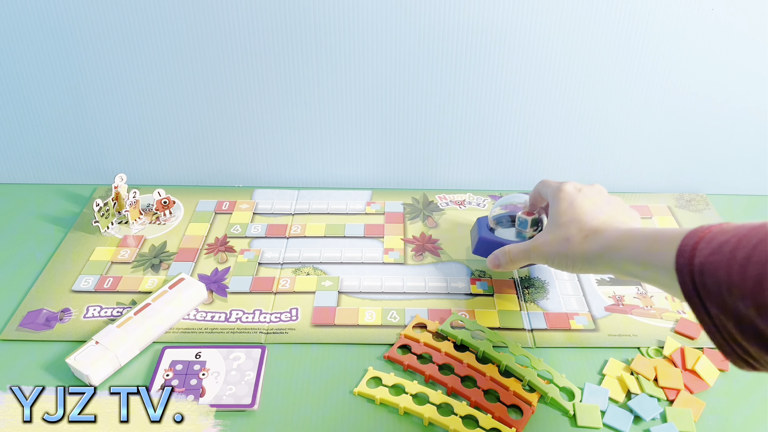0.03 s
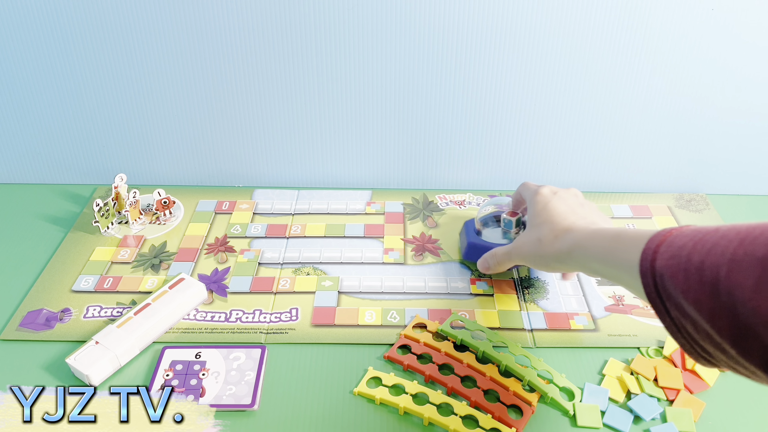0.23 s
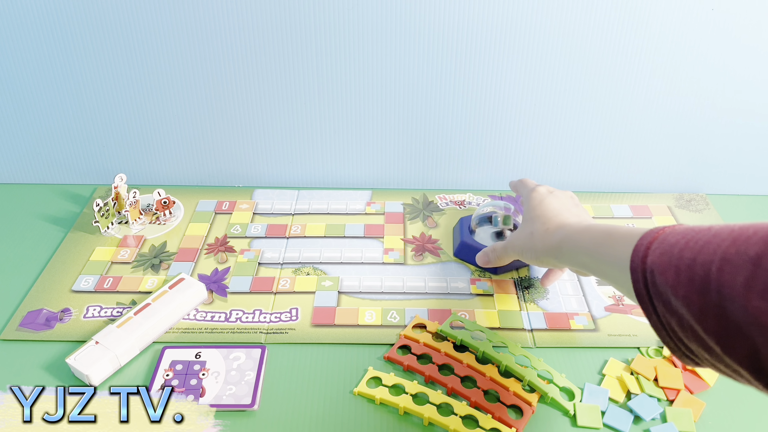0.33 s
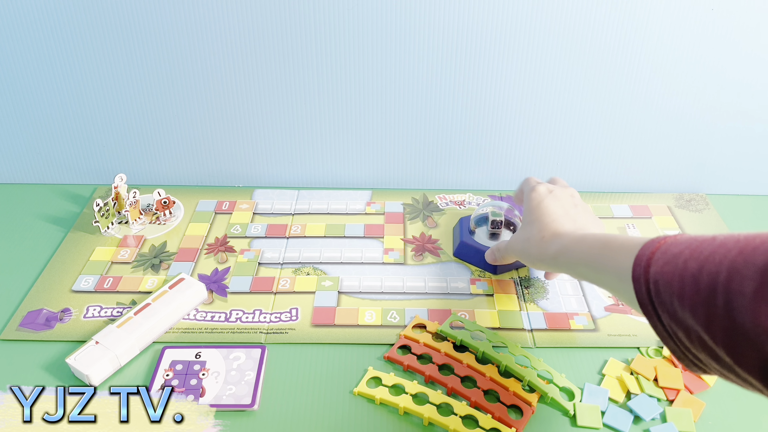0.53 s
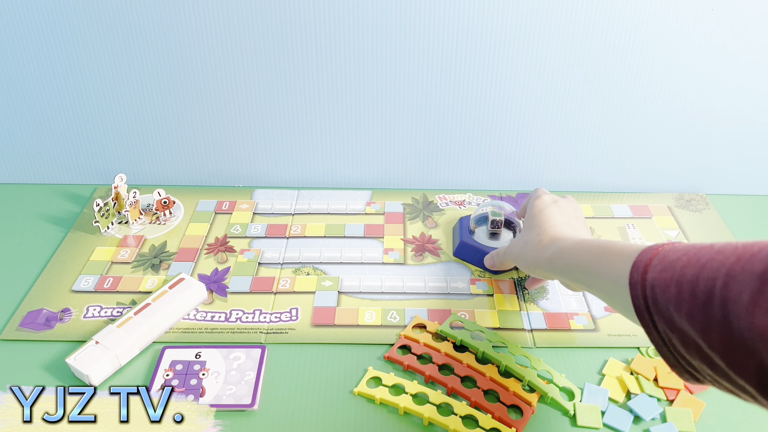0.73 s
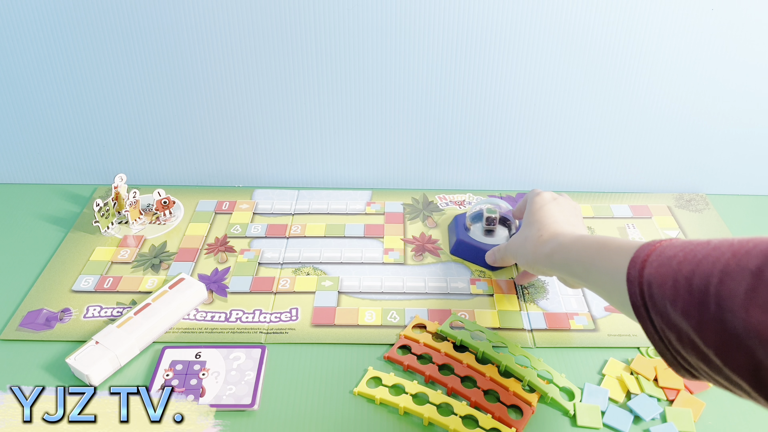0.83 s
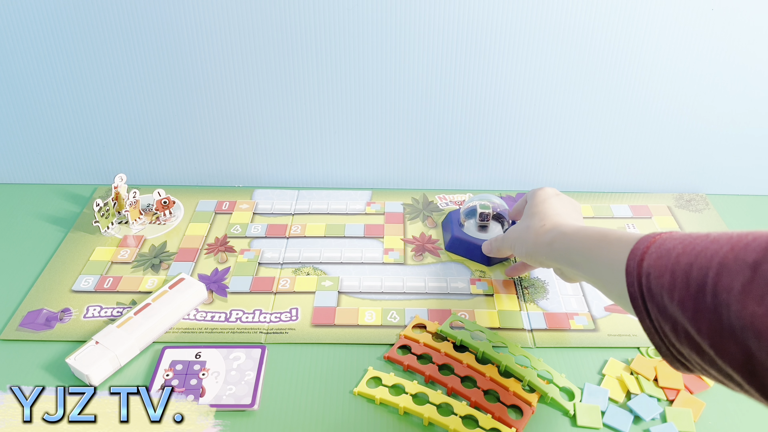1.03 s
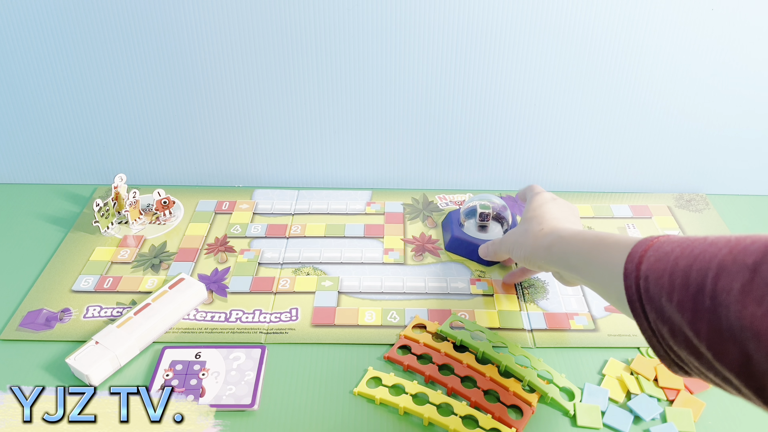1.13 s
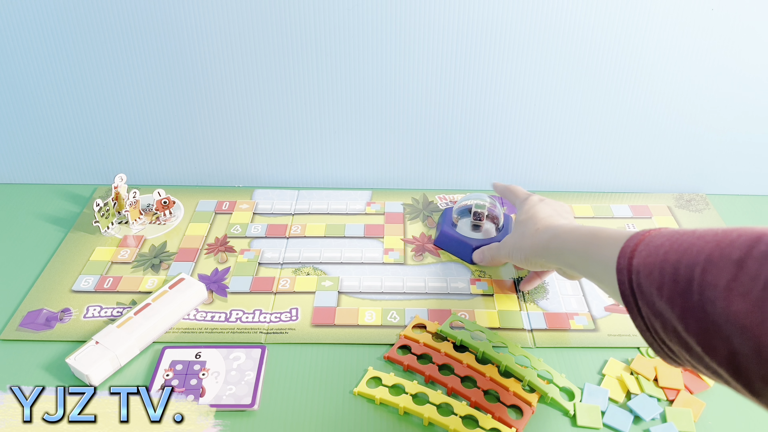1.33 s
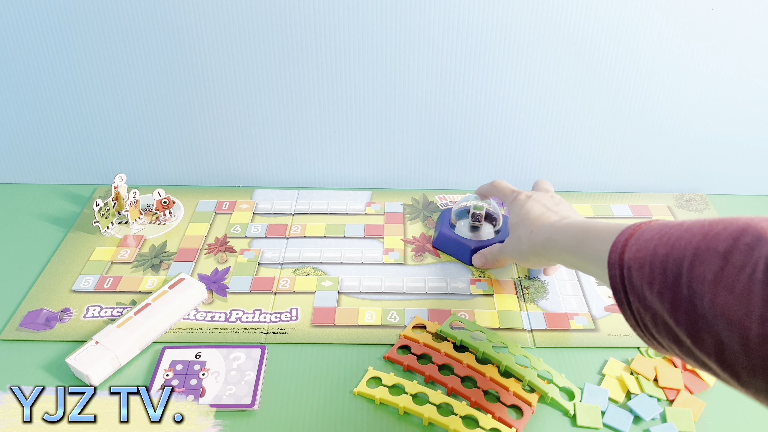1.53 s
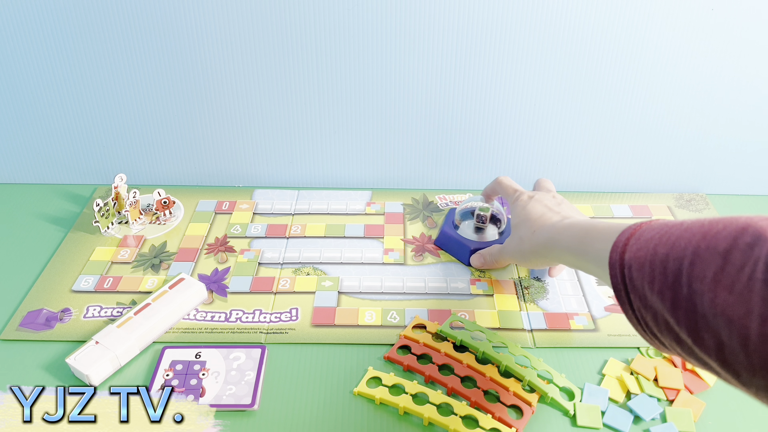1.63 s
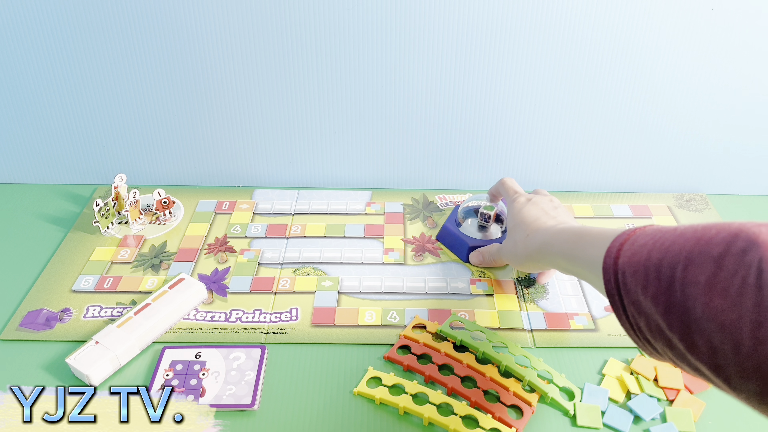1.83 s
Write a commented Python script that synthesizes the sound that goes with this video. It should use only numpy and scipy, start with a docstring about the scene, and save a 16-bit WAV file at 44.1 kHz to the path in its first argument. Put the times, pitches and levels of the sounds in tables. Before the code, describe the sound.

A plastic dice dome pops once at about 0.22 seconds: a tight burst of hard cracks with a low thump, then the die rattles densely until about 0.4, with a short plastic ring and small-room reflections. Quiet double clicks come near 0.77 and 1.25, soft board knocks at 1.37 and 1.53. Faint grainy hand rubbing and an uneven low rumble run throughout; a very faint tone fades at the start.

```python
"""Dice popper on a game board

A spring plate snaps with sharp plastic cracks and a low thump, and a die rattles around the dome.
Noise bands decaying from each contact make the dense clatter; wavering sines make the dome's ring.
Hand and sleeve rub softly throughout as grainy coloured noise. A faint wavering tone dies away at
the start; a few light clicks, knocks and short scuffs follow the rattle. Reflections give the small
room around the clatter, over a low rumble of noise whose bass swells and sinks."""
import sys
import numpy as np
from scipy import signal
from scipy.io import wavfile
from scipy.ndimage import uniform_filter1d

SR = 44100
rng = np.random.default_rng(int(sys.argv[2]) if len(sys.argv) > 2 else 0)


def digitize_waveform(pressure):
    """Quantize a signal to 16-bit integers and store it at the path in sys.argv[1].

    Rows of a 2-D input are taken as channels; values are limited to [-1, 1].
    """
    field = np.atleast_2d(pressure).T
    bounded = np.clip(field, -1, 1)
    quanta = np.round(bounded * 32767).astype(np.int16)
    wavfile.write(sys.argv[1], SR, quanta)


N = 83790
TIME = np.arange(N) / SR
EDGES = 25 * 2 ** (np.arange(29) / 3)   # third-octave band edges [Hz]


def from_db(db):
    """Decibels to an amplitude factor."""
    return 10 ** (np.asarray(db) / 20)


def rms_one(x):
    """Scales a signal to an rms of 1."""
    return x / np.sqrt(np.mean(x ** 2) + 1e-20)


def at_hz(points, hz):
    """Reads a curve at a frequency, interpolating along log frequency."""
    curve_hz, values = np.array(points).T
    return np.interp(np.log(hz), np.log(curve_hz), values)


def dying(t, t60):
    """Falls by 60 dB in t60 seconds."""
    return np.exp(-np.log(1000) * t / t60)


def flutter(size):
    """Random wavering, smoothed twice over size samples; rms 1."""
    smoothed = uniform_filter1d(rng.standard_normal(N), size=size)
    return rms_one(uniform_filter1d(smoothed, size=size))


def bands():
    """Yields each third-octave band as (centre Hz, filter, stereo noise of that band's width)."""
    # side against middle: (frequency [Hz], level [dB])
    side_width = [(60, -15.5), (200, -11.5), (380, -7), (700, 0.5), (1290, 3.5), (2200, -7), (4400, -1),
                  (9000, -5), (15000, 6)]
    white = rng.standard_normal((2, 2, N))
    for k, edges in enumerate(zip(EDGES, EDGES[1:])):
        sos = signal.butter(2, edges, "band", fs=SR, output="sos")
        hz = np.sqrt(np.prod(edges))
        mid, side = white[k % 2]   # neighbouring bands get different noise
        width = from_db(at_hz(side_width, hz))
        stereo = np.array([mid + width * side, mid - width * side])
        yield hz, sos, stereo / np.hypot(1, width)


def coloured_noise(spectrum):
    """Steady stereo noise shaped band by band; rms 1."""
    out = 0
    for hz, sos, noise in bands():
        out = out + from_db(at_hz(spectrum, hz)) * signal.sosfilt(sos, noise)
    return rms_one(out)


def rumble():
    """Steady room noise whose bass swells and sinks."""
    # noise colour before levelling: (frequency [Hz], density [dB per Hz])
    colour = [(25, -28), (42, -8), (70, 2), (100, -4.5), (160, -7), (280, -13), (430, -5.5), (600, -17),
              (1000, -15.5), (2000, -32), (4000, -41.5), (8000, -45.5), (15000, -50)]
    # gain of the bass: (time [s], level [dB])
    bass_swell = [(0, 5), (.2, -2), (.47, -10), (.61, 7.5), (.76, 0.5), (.86, -2), (1.03, 4.5),
                  (1.25, -2.5), (1.65, 0), (1.9, -2)]
    level_db, swell_below_hz = -55.5, 160   # level before the swell
    noise = from_db(level_db) * coloured_noise(colour)
    low_pass = signal.butter(2, swell_below_hz, fs=SR, output="sos")
    bass = signal.sosfiltfilt(low_pass, noise)
    bass_gain = from_db(np.interp(TIME, *np.transpose(bass_swell)))
    return noise + bass * (bass_gain - 1)


def rubbing(grain_db=1.5):
    """Skin and cloth slide over plastic: a faint, grainy hiss."""
    # strokes before the grain: (time [s], level [dB])
    strokes = [(0, -53), (.09, -70.5), (.17, -64), (.55, -59.5), (.62, -70), (.665, -58), (.70, -62.5),
               (.755, -55.5), (.83, -64.5), (.97, -73), (1.06, -65), (1.21, -55.5), (1.35, -65),
               (1.41, -60.5), (1.56, -64.5), (1.69, -74.5), (1.745, -60.5), (1.84, -83.5), (1.9, -61.5)]
    # hiss colour before levelling: (frequency [Hz], density [dB per Hz])
    colour = [(300, -6), (900, 8.5), (2000, 1.5), (2700, -8), (4200, -5), (6500, -13), (9500, -7),
              (12300, -22), (14500, -11)]
    level_db = np.interp(TIME, *np.transpose(strokes)) + grain_db * flutter(size=120)
    return from_db(level_db) * coloured_noise(colour)


def room(x):
    """Dense reflections build up quickly and die away, sooner in the treble."""
    # reverberation time: (frequency [Hz], t60 [s])
    room_t60 = [(120, 0.49), (500, 0.49), (1500, 0.49), (5000, 0.41), (12000, 0.22)]
    room_db, build_s = -9.5, 0.0059
    response = 0
    for hz, sos, noise in bands():
        envelope = dying(TIME, at_hz(room_t60, hz)) * (1 - np.exp(-TIME / build_s))
        response = response + signal.sosfilt(sos, noise * envelope)
    response = rms_one(response) / np.sqrt(N)   # mean energy of 1 per channel
    # the left channel alone feeds the stereo room
    return from_db(room_db) * signal.fftconvolve(x[:1], response, axes=1)[:, :N]


def tabletop(x):
    """Close reflections off board and table join the direct sound and comb the spectrum."""
    # reflections: (left delay [ms], right delay [ms], level against the direct sound [dB])
    echoes = [(.93, 1.3, -17.5), (2.15, 2.2, -14.5), (3.6, 3.1, -9), (6.1, 5.9, -12)]
    out = x
    for left_ms, right_ms, db in echoes:
        left = np.interp(TIME - left_ms / 1000, TIME, x[0], left=0)
        right = np.interp(TIME - right_ms / 1000, TIME, x[1], left=0)
        out = out + from_db(db) * np.array([left, right])
    return from_db(-2) * out   # direct sound and reflections together


def hollow(x):
    """The housing radiates poorly between its resonances, so notches cut the spectrum there."""
    # notches: (frequency [Hz], width [Hz])
    hollows = [(305, 26), (585, 80), (895, 28), (1470, 120), (2360, 200), (3660, 170)]
    for hz, width_hz in hollows:
        x = signal.lfilter(*signal.iirnotch(hz, hz / width_hz, fs=SR), x)
    return x


def blows(hits, hz):
    """One impulse per contact, as strong as the contact is at this frequency."""
    s, db, tilt = np.transpose(hits)
    out = np.zeros(N)
    strength = from_db(db + tilt * np.log2(hz / 2500))   # brightness tilts about 2.5 kHz
    np.add.at(out, (s * SR).astype(int), strength)
    return out + 1e-18   # keeps later divisions safe


def housing(hits, colour, t60_s, crack_db):
    """Each contact cracks and sets the many damped modes of the plastic ringing, the high ones briefly."""
    crack_s, ring_shortens = 0.00043, 0.32   # amplitude time constant; power of frequency
    out = 0
    for hz, sos, noise in bands():
        force = blows(hits, hz)
        t60 = t60_s * (1000 / max(hz, 400)) ** ring_shortens   # t60_s holds at 1 kHz
        # energy decays twice as fast as amplitude
        ring = signal.lfilter([1], [1, -dying(2 / SR, t60)], force ** 2)
        crack_force = from_db(crack_db) * force
        crack = signal.lfilter([1], [1, -np.exp(-2 / (crack_s * SR))], crack_force ** 2)
        burst = signal.sosfilt(sos, noise * np.sqrt(ring + crack))
        out = out + from_db(at_hz(colour, hz)) * burst
    return out * from_db(-5)   # level of the whole housing


def ringing(hits, modes, slip=0.55, wander=.014):
    """Every contact adds energy to each mode and knocks its phase; the ring wavers as it dies."""
    waver_db = 4.5
    out = 0
    for hz, db, t60, phase in modes:
        fed = blows(hits, hz) ** 2
        energy = signal.lfilter([1], [1, -dying(2 / SR, t60)], fed)
        # phase jumps with each fresh share of energy and drifts in between
        kicks = (slip * np.sqrt(fed / energy) + wander) * rng.standard_normal(N)
        angle = 2 * np.pi * hz * TIME + np.cumsum(kicks)
        level = from_db(db + waver_db * flutter(size=700))
        out = out + level * np.sqrt(energy) * np.sin([angle, angle + phase])
    return out


def faint_tone_and_scuffs():
    """A faint wavering tone dying away at the start, then short scuffs: noise through one resonance each."""
    # the tone, then the scuffs: (time of peak [s], length [s], level [dB], resonance [Hz], width [Hz])
    sounds = [(0.004, 0.049, -53, 1278, 12), (1.086, 0.046, -58.5, 975, 220),
              (1.753, 0.057, -70.5, 2060, 850)]
    out = 0
    for s, length_s, db, hz, width_hz in sounds:
        resonance = signal.iirpeak(hz, hz / width_hz, fs=SR)
        tone = signal.lfilter(*resonance, rng.standard_normal(N))
        swell = np.exp(-(2 * (TIME - s) / length_s) ** 2)
        out = out + from_db(db) * swell * rms_one(tone)
    return out


def handling():
    """Clicks ring the popper in the hand; knocks ring the board as well."""
    # light clicks: (time [s], level at 2.5 kHz [dB], brightness [dB per octave])
    clicks = [(.7715, -42.5, -5.5), (.778, -42.5, -4), (0.791, -57.5, -3), (1.2462, -42, -2.5),
              (1.2495, -39.5, -1), (1.256, -42.5, -4)]
    # soft knocks against the board: (time [s], level at 2.5 kHz [dB], brightness [dB per octave])
    knocks = [(1.3665, -50.5, -3.5), (1.3689, -42.5, -1.5), (1.5264, -49.5, -2.5)]
    # colour of clicks and knocks: (frequency [Hz], density [dB per Hz])
    colour = [(150, -18.5), (430, 5), (560, -6.5), (780, 10), (1200, -14), (1750, 8), (2400, -24),
              (3200, 4), (6500, -6), (9500, 4.5), (15000, -19)]
    # modes of the popper: (frequency [Hz], level [dB], t60 [s], left-right phase [rad])
    popper_modes = [(1684, -6.5, 0.0358, .3), (2123, -11.5, 0.05, 0.89), (2800, -14, 0.036, 0.98),
                    (3190, -16, 0.052, 0.82), (3460, -22, 0.051, 1), (4400, -21, 0.038, .5),
                    (4810, -16, 0.052, 0.65), (5900, -19, 0.028, 0.93), (7500, -14.5, 0.041, 0.47)]
    # modes of the board: (frequency [Hz], level [dB], t60 [s], left-right phase [rad])
    board_modes = [(460, -6.5, 0.064, .3), (733, -7.5, 0.05, 0.85), (935, -14, .035, 0.75)]
    ticks = housing(np.vstack([clicks, knocks]), colour, t60_s=0.059, crack_db=0)
    clicked_popper = ringing(clicks, popper_modes, slip=0.366)
    knocked_popper = from_db(-6) * ringing(knocks, popper_modes, slip=0.412)
    board = ringing(knocks, board_modes, slip=0.22, wander=0.0026)
    return ticks + clicked_popper + knocked_popper + board


def thump():
    """The flipping plate pushes the air in the dome: low, quickly damped swings."""
    # swings: (time [s], level [dB], frequency [Hz], t60 [s])
    swings = [(0.2244, -42, 222, 0.1), (0.229, -28.5, 432, 0.045)]
    out = 0
    for s, db, hz, t60 in swings:
        t = np.maximum(TIME - s, 0)
        out = out + from_db(db) * dying(t, t60) * np.sin(2 * np.pi * hz * t)
    return out


def dome_ring(snaps, rattle):
    """Plate and die feed the modes of dome and plate; the light die stirs the low ones less."""
    # modes: (frequency [Hz], level [dB], t60 [s], left-right phase [rad])
    modes = [(228, -33, 0.096, 0.3), (390.4, -35, 0.07, 0.64), (466.4, -34.5, 0.13, 1.8),
             (699, -22, 0.1, 1.28), (812, -32.5, .1, 1.5), (991, -31, .11, 3.5), (1066, -30.5, 0.11, -0.5),
             (1150.3, -29, 0.35, 4.5), (1210, -31.5, 0.5, 1.5), (1286, -38.5, 0.18, 3),
             (1630, -33.5, 0.19, 1.3), (1858, -30.5, 0.18, 0.4), (1920, -32, 0.12, -0.1),
             (1980, -34, 0.16, -2), (2103, -35, 0.18, -1), (2462, -34.5, 0.14, 1.45),
             (2660, -35, 0.29, -2.9), (2847, -36, 0.28, 1.9), (3120, -37, 0.09, -1.1),
             (3253, -38.5, 0.35, -0.8), (3890, -39.5, 0.16, -0.6), (4400, -39.5, .3, -0.5),
             (4990, -38, 0.2, -2), (6040, -38, 0.28, 2)]
    brighter_die = rattle + [0, 0, 2]   # extra brightness [dB per octave]
    return ringing(np.vstack([snaps, brighter_die]), modes)


def tumbling(count=4):
    """After each bounce the tumbling die's corners touch again, lightly and at uneven intervals."""
    # bounces on dome and plate: (time [s], level at 2.5 kHz [dB], brightness [dB per octave])
    bounces = np.array([(0.2658, -28.5, 7), (.274, -33, 8), (0.283, -19.5, -0.5), (.288, -17, -3.5),
                        (0.2923, -15, 1), (0.296, -21.5, 0.5), (0.3082, -19.5, 3.5), (.316, -26.5, 4.5),
                        (.322, -24, 0.5), (.328, -20, -0.5), (0.331, -26, 5), (.341, -22, -1),
                        (0.347, -35, 9), (0.351, -21, 1.5), (.357, -18.5, 3.5), (0.3603, -18, 0),
                        (0.364, -26.5, -4.5), (0.371, -39.5, 10), (0.376, -31, -1.5), (0.381, -40, 10.5)])
    chatter_s, chatter_db = 0.01, -8.5   # touches fall within this time, at least this much softer
    delay, softness = rng.random((len(bounces), count, 2)).transpose(2, 0, 1)
    touches = np.repeat(bounces, count, axis=0)
    touches[:, 0] += chatter_s * delay.ravel()
    touches[:, 1] += chatter_db - 4 * softness.ravel()
    return np.vstack([bounces, touches])


def rattling_die(rattle):
    """The die's lighter contacts crack and ring the plastic."""
    # colour of the contacts' noise: (frequency [Hz], density [dB per Hz])
    colour = [(100, -39.5), (220, -14.5), (400, -0.5), (720, 3.5), (950, -6.5), (1150, 6), (1450, 5),
              (2080, 5), (2500, -9.5), (3200, -1.5), (3700, -3.5), (5200, 0), (7000, -6.5), (9000, -0.5),
              (12500, -12.5), (15000, -4)]
    return housing(rattle, colour, t60_s=0.05, crack_db=0.5)


def snapping_plate(snaps):
    """The spring plate buckles and snaps: hard cracks and a dense short ring of the housing."""
    # colour of the snaps' noise: (frequency [Hz], density [dB per Hz])
    colour = [(30, -53), (60, -36), (130, -19), (210, -13.5), (310, -10.5), (450, -5), (720, -3), (950, -5),
              (1150, -1.5), (1450, -2), (1950, 3), (2400, -0.5), (3100, 6.5), (3700, 0.5), (5000, 2),
              (7000, -3), (10000, 4), (12500, -25.5), (15000, 1)]
    return housing(snaps, colour, t60_s=0.063, crack_db=8.5)


def scene():
    """The popper and its reflections, the rubbing hand and the room's rumble."""
    # snaps of the plate: (time [s], level at 2.5 kHz [dB], brightness [dB per octave])
    snaps = [(.2232, -14.5, -4), (.2276, -11, -0.5), (.2294, -9, 1), (.2335, -18, -0.3),
             (.2388, -12.5, -2.5), (.2406, -5.5, -3.5), (.2425, -7.5, -3.8), (.2475, -13.5, -1),
             (.2510, -11.5, 0.5), (.2575, -19.5, -2.5)]
    background = rumble() + rubbing()
    rattle = tumbling()
    pop = snapping_plate(snaps) + rattling_die(rattle)
    clatter = hollow(tabletop(pop)) + handling() + faint_tone_and_scuffs()
    dome = dome_ring(snaps, rattle) + thump()   # stays out of the room reflections
    return background + clatter + room(clatter) + dome


def record(dry):
    """A steep low-pass cuts the top."""
    cutoff_hz = 15900
    low_pass = signal.ellip(10, .2, 80, cutoff_hz, fs=SR, output="sos")
    return signal.sosfilt(low_pass, dry)


dry = scene()
out = record(dry)
digitize_waveform(out)
```